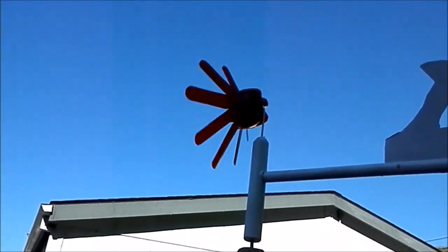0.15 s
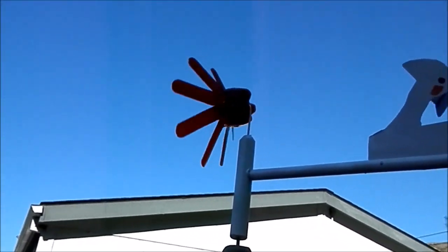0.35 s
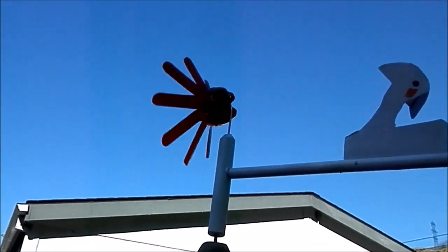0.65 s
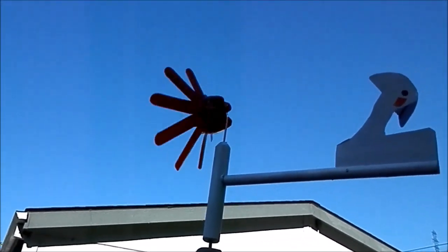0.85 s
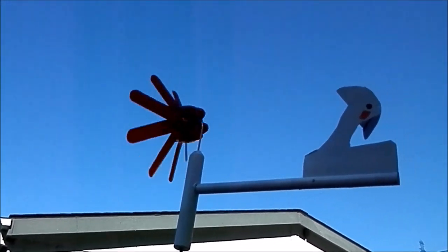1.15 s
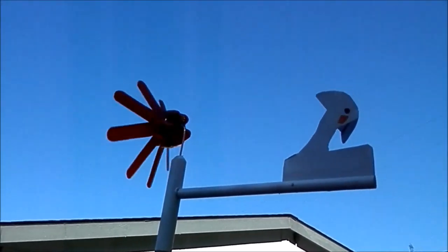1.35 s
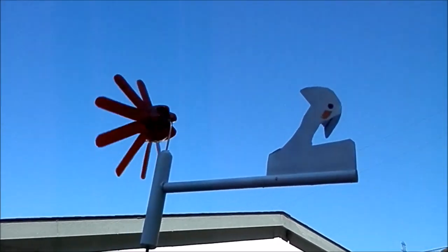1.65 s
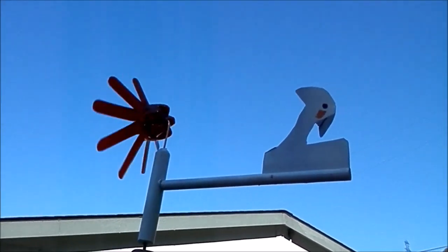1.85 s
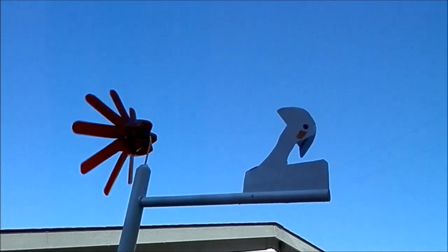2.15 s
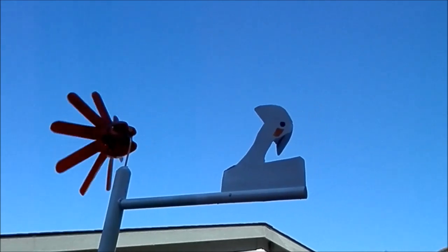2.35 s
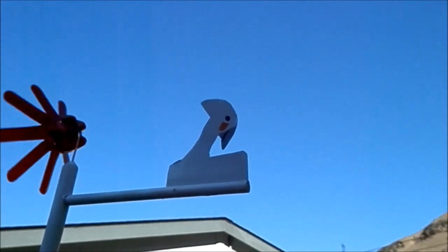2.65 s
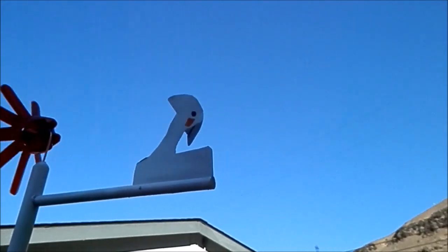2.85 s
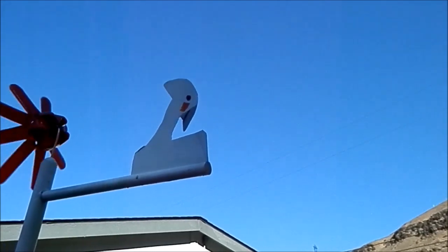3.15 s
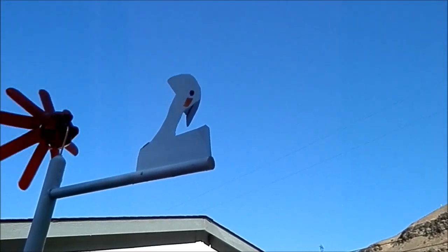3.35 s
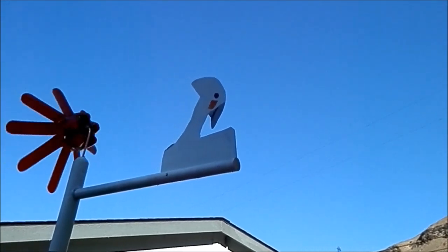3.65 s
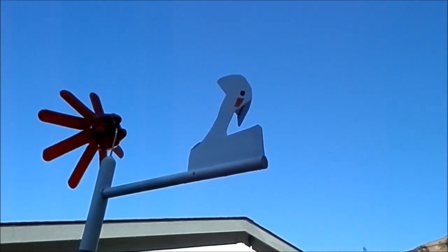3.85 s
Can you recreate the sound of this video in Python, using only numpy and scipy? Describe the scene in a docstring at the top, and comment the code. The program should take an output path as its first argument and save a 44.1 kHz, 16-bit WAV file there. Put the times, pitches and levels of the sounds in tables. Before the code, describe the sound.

A wind spinner chatters and clacks on its axle outdoors, with gusts rumbling later on.

```python
"""In a garden, a whirligig spins in the wind. Its loose hub chatters and scrapes on the axle,
in uneven surges, with sharper clacks. The dry axle sticks and slips, making brief squeaks,
while the shaken blades and arm give a hollow drone. From about halfway on, gusts buffet
the microphone, and the last one rustles through the blades. Open air rushes softly behind."""
import sys
import numpy as np
from scipy import signal
from scipy.fft import rfft, irfft, next_fast_len
from scipy.io import wavfile
from scipy.ndimage import uniform_filter1d, map_coordinates

SR = 44100
rng = np.random.default_rng(int(sys.argv[2]) if len(sys.argv) > 2 else 0)


def dump(signal):
    """Clip the signal to [-1, 1] and save it as 16-bit WAV at the path in sys.argv[1]."""
    limited = np.clip(np.atleast_2d(signal).T, -1, 1)
    pcm = np.round(limited * 32767).astype(np.int16)
    wavfile.write(sys.argv[1], SR, pcm)


N = 176400  # 4 seconds
TIME_S = np.arange(N) / SR
TOP_HZ = 15950  # the highest pitch in the scene

# Moments when the hub presses on the axle: time_s, half_length_s, rattle_db, hum_db
RUBS = [(.008, 0.0069, 13, -15), (0.198, 0.0092, 13.5, 1), (0.373, 0.013, 11, 13.5), (0.54, 0.035, 4.5, 7),
        (0.929, 0.018, 5, -12), (1.203, 0.036, 1.5, 6.5), (1.405, 0.03, 8, 12), (1.597, 0.015, 5.5, 15),
        (1.771, 0.015, 10, 2), (1.961, 0.035, 5.5, 12.5), (2.108, 0.009, 10.5, 16.5),
        (2.485, 0.012, 7.5, 15), (2.58, 0.019, 3.5, 17), (2.649, 0.018, 5, -4), (2.737, 0.033, 3, 10.5),
        (2.785, 0.0061, 15, 16), (2.975, 0.014, 5.5, -9), (3.513, 0.011, 7.5, 0), (3.709, 0.009, 9.5, 3),
        (3.897, 0.085, -13, 8)]
# How strongly the hub rattles between rubs: time_s, level_db
LOOSE_RATTLE = [(0, 2.5), (.3, 2), (.8, 2.5), (.86, -2), (1.02, 0), (1.45, 5), (1.54, -1.5), (1.7, 3),
                (1.87, -1), (2.15, 1.5), (2.45, 4), (2.53, -10), (2.62, -1), (2.87, -0.5), (3.08, 1),
                (3.2, -11), (3.31, -2.5), (3.42, -5), (3.75, -4), (4, 0)]
def whirligig():
    """The hub rubs on its axle, and that force shakes the whole toy."""
    loose_db = curve(LOOSE_RATTLE)
    _, _, rattle_db, hum_db = np.transpose(RUBS)
    force = rub_force(loose_db, rattle_db)
    follow = 0.68  # below 1, so the blades and arm swell less than the rattle
    hum_force = rub_force(follow * loose_db, hum_db)
    return hub(force, amp(loose_db)) + frame_drone(force ** follow) + arm_hum(hum_force)


def rub_force(between_db, peaks_db):
    """How hard the hub works against the axle: a base level plus a swell for each rub."""
    rubs = sum((amp(db) * swell(s, half)) ** 2 for (s, half, *_), db in zip(RUBS, peaks_db))
    return np.sqrt(amp(between_db) ** 2 + rubs)


# Tone of a hit, before and after the vane swings round: pitch_hz, before_db, after_db
HIT_TONE = [(258, -20, 3.5), (690, -3.5, 9.5), (1138, 0, 10), (1446, -8.5, -9), (2400, -4.5, 2),
            (3770, 0, 2), (4950, -13, -6.5), (6410, -4, -2), (9000, 0.5, 6.5), (11340, -12.5, -4.5),
            (14400, -9, -2.5)]
# Notes at which the hub and axle ring: pitch_hz, width_hz, boost_before_db, boost_after_db
HUB_NOTES = [(1428, 32, -8, 16.5), (1738, 68, 10.5, 16.5), (2824, 70, 6.5, 13), (3355, 78, 9.5, 13.5),
             (4790, 186, 7.5, 14.5), (6150, 690, 9.5, 7.5), (7890, 260, 13.5, -5), (8624, 150, 16, 8.5)]
def hub(force, loose):
    """Hits, scrapes and squeaks make the hub ring; its tone shifts as the vane swings round."""
    clumps = flicker(depth_db=4.5, per_s=32)  # the ticks come in bunches
    chatter = amp(-67.5) * loose * unit(clumps * ticks(per_s=150, spread_db=6))
    pressing = np.sqrt(np.abs(force ** 2 - loose ** 2))
    grind = amp(-67) * pressing * ticks(per_s=330, spread_db=4)  # pressing crowds the ticks together
    soften = signal.butter(2, 3700, fs=SR)  # turns down the treble above 3700 Hz
    scrape = amp(-72.5) * force * unit(signal.lfilter(*soften, grit(depth_db=8.5, per_s=270)))
    knocks = clacks()
    shaking = wander(chatter + grind + scrape) + knocks + squeaks() + chirps()
    tone, notes = np.array(HIT_TONE), np.array(HUB_NOTES)
    before = ring(shaking, tone[:, [0, 1]], notes[:, [0, 1, 2]])
    after = ring(shaking, tone[:, [0, 2]], notes[:, [0, 1, 3]])
    swing = curve([(0.77, 0), (2.13, 1)])  # the vane turns between these two times
    return (1 - swing) * before + swing * after


def wander(sound, depth_db=5):
    """The tone keeps changing as the touching point moves about."""
    spectrum = signal.stft(sound, nperseg=256)[2]
    drift = uniform_filter1d(rng.standard_normal(spectrum.shape), size=9, axis=0)  # smooth over pitch
    drift = uniform_filter1d(drift, size=6, axis=1)  # smooth over time
    return signal.istft(spectrum * amp(depth_db * np.tanh(unit(drift))), nperseg=256)[1][:N]


# Single hard knocks of the hub: start_s, relative_level_db
CLACKS = [(0.16, -47), (0.175, -39), (0.349, -38), (0.392, -37.5), (0.4858, -44), (0.5018, -39),
          (0.551, -39.5), (0.5966, -45.5), (0.7604, -39), (0.9034, -43.5), (1.5748, -44.5), (1.6684, -46),
          (1.736, -43.5), (2.0916, -45.5), (2.1429, -45), (2.2608, -48), (2.6272, -44), (2.6589, -38),
          (2.7033, -45), (2.82, -43.5), (3.5926, -40), (3.6938, -37.5), (3.8811, -37.5)]
def clacks():
    """The loose hub knocks sharply against the axle."""
    start_s, level_db = np.transpose(CLACKS)
    return hits(start_s, amp(level_db - 6), decay_s=0.002)


# Squeaks of the axle: middle_s, half_length_s, pitch_hz, level_db
SQUEAKS = [(0.222, 0.0051, 597, -55), (0.98, 0.0099, 975, -64), (1.322, 0.0054, 1240, -65),
           (2.564, 0.013, 691.5, -63), (2.747, 0.0094, 664.4, -60)]
def squeaks(waver=0.0096, uneven_db=3, dull_above_hz=5500):
    """The dry axle sticks and slips fast enough to sing a rough, wavering note."""
    out = np.zeros(N)
    wavering_time = np.cumsum(1 + waver * wobble(470)) / SR
    for middle_s, half_s, pitch_hz, level_db in SQUEAKS:
        level = swell(middle_s, half_s)
        on = level > .001
        overtones_hz = pitch_hz * np.arange(1, TOP_HZ // pitch_hz)[:, None]
        gains = amp(uneven_db * rng.standard_normal(overtones_hz.shape))
        gains /= 1 + (overtones_hz / dull_above_hz) ** 2
        cycles = overtones_hz * wavering_time[on] + rng.random(overtones_hz.shape)
        note = (gains * np.cos(2 * np.pi * cycles)).sum(0)
        out[on] += amp(level_db) * level[on] * unit(note)
    return out * flicker(depth_db=4, per_s=790)


# Single quick slips of the axle: middle_s, pitch_hz, level_db
CHIRPS = [(0.245, 4650, -64), (0.9715, 4000, -50), (1.344, 4470, -60)]
def chirps(half_s=0.0013, fall_octaves_per_s=110):
    """Each slip whistles downwards, with a weaker note an octave higher."""
    out = np.zeros(N)
    for middle_s, pitch_hz, level_db in CHIRPS:
        octaves = np.clip(fall_octaves_per_s * (middle_s - TIME_S), -.5, .5)
        phase = 2 * np.pi * np.cumsum(pitch_hz * 2 ** octaves) / SR
        out += amp(level_db) * swell(middle_s, half_s) * (np.sin(phase) + .5 * np.sin(2 * phase))
    return out


# Overall tone of the blades and arm: pitch_hz, level_db
FRAME_TONE = [(100, -25.5), (290, 4), (400, -2), (600, 0), (850, -4.5), (1200, -8), (1600, -23),
              (3000, -37)]
# Notes at which they ring: pitch_hz, width_hz, boost_db
FRAME_NOTES = [(488, 22.5, 15), (528.3, 12.4, 19), (626, 48, 8.5), (735, 17, 11), (944, 7, 9),
               (1107, 24.6, 15)]
def frame_drone(force):
    """The rattling hub makes the blades and arm ring with a hollow sound."""
    return amp(-62.5) * ring(force * grit(depth_db=4.5, per_s=90), FRAME_TONE, FRAME_NOTES)


def arm_hum(force, pitch_hz=494.8, waver_hz=23.77):
    """Rubbing keeps the arm's main note going, fluttering in pitch and loudness."""
    phase = 2 * np.pi * np.cumsum(pitch_hz + waver_hz * wobble(90)) / SR
    return amp(-66) * force * unit(np.sin(phase) * flicker(depth_db=4, per_s=65))


# Tone of air passing through the blades: pitch_hz, level_db
SWISH_TONE = [(600, 2), (1900, 15), (6300, 4), (12000, -26)]
def blade_swish(middle_s=3.92, half_s=.14, grains_per_s=290):
    """The last gust rustles through the blades as many tiny bursts of noise."""
    start_s = middle_s - 2 * half_s
    length_s = N / SR - start_s
    times = start_s + length_s * rng.random(int(length_s * grains_per_s))
    grains = unit(hits(times, np.ones(len(times)), decay_s=0.0028))
    grains *= np.sqrt(length_s * SR / N)  # strength 1 over just the part that sounds
    return amp(-64) * swell(middle_s, half_s) * ring(grains, SWISH_TONE)


# Strength of the wind on the microphone: time_s, level_db
GUSTS = [(0, -72), (1.42, -78), (1.5, -46), (1.68, -63.5), (1.93, -59), (2.04, -41.5), (2.27, -45.5),
         (2.39, -49), (2.54, -40), (2.82, -40.5), (2.89, -54), (2.99, -34), (3.08, -48), (3.28, -49.5),
         (3.45, -39), (3.85, -38.5), (3.94, -64.5)]
# Single swirls of air hitting the microphone: middle_s, peak_db, half_length_s
THUMPS = [(1.5, -37.5, 0.0059), (2.102, -29, 0.0026), (2.301, -28.5, 0.003), (2.533, -26.5, 0.0025),
          (2.701, -27.5, 0.0021), (2.729, -26.5, .0025), (2.8008, -20.5, 0.00168), (2.821, -27, 0.0025),
          (2.985, -29, 0.0051), (2.994, -22.5, 0.0014), (3.344, -30, 0.0036), (3.467, -26.5, 0.0019),
          (3.638, -27, 0.0016)]
# Tone of the deep rumble: pitch_hz, level_db
RUMBLE_TONE = [(15, -2.5), (30, 1), (85, 0.5), (150, -8), (230, -16), (450, -36), (4000, -82)]
# Tone of the small, fluttering swirls: pitch_hz, level_db
FLUTTER_TONE = [(60, -13.5), (170, 0), (330, -10), (800, -30.5), (3000, -59.5)]
def wind():
    """Gusts rumble and thump on the microphone; small swirls make the strong ones brighter."""
    gust = amp(curve(GUSTS))
    rumble = gust * ring(grit(depth_db=4.5, per_s=30), RUMBLE_TONE)
    wakes = amp(-20.5) * sum(amp(db) * swell(s, half_s=0.015) for s, db, _ in THUMPS)  # stirred-up air
    swirls = amp(-12) * gust.max() * (gust / gust.max()) ** 2.5
    flutter = np.hypot(swirls, wakes) * ring(grit(depth_db=7.5, per_s=120), FLUTTER_TONE)
    thumps = np.zeros(N)
    for middle_s, peak_db, half_s in THUMPS:
        offset = (TIME_S - middle_s) / half_s
        thumps += amp(peak_db) * (1 - offset ** 2) / (1 + offset ** 2) ** 2  # a push between two dips
    return rumble + flutter + thumps


# Tone of the background air: pitch_hz, level_db
AIR_TONE = [(20, 11), (250, 8), (1000, -11.5), (2500, -21.5), (8000, -61), (16000, -47)]
def open_air():
    """The air outdoors makes a soft, low, steady rush."""
    return amp(-63) * ring(rng.standard_normal(N), AIR_TONE)


def ticks(per_s, spread_db, jitter=.6):
    """A run of small hits, uneven in timing and loudness."""
    early_late, soft_loud = rng.standard_normal((N // 100, 2)).T
    times = (np.arange(len(early_late)) + jitter * early_late) / per_s
    return unit(hits(times, amp(spread_db * np.tanh(soft_loud)), decay_s=0.00095))


def hits(times, gains, decay_s, buzz_s=.004, buzz_db=-10):
    """Each hit is a sharp crack followed by a short, weaker buzz."""
    starts = np.clip(times * SR, 0, N).astype(int)
    power = np.bincount(starts, gains ** 2, N + 1)[:N]
    crack, buzz = (signal.lfilter([1], [1, -np.exp(-2 / (s * SR))], power) for s in (decay_s, buzz_s))
    return np.sqrt(crack + amp(buzz_db) ** 2 * buzz) * rng.standard_normal(N)


def ring(sound, tone, notes=()):
    """Give a sound an overall tone and, if wanted, notes that ring on."""
    size = 2 ** 14
    hz = np.fft.rfftfreq(size, 1 / SR)
    tone_hz, tone_db = np.transpose(tone)
    gain = amp(np.interp(np.log(hz + 1), np.log(tone_hz + 1), tone_db))
    boost = 1 + sum(amp(db) ** 2 / (1 + (2 * (hz - pitch) / width) ** 2) for pitch, width, db in notes)
    # Fold the filter in time so that ringing comes after a hit, never before it.
    folded = irfft(np.log(gain * np.sqrt(boost)))
    folded[1:size // 2] *= 2
    folded[size // 2 + 1:] = 0
    ringing = irfft(np.exp(rfft(folded)))
    return signal.fftconvolve(sound, ringing / np.linalg.norm(ringing))[:N]


def grit(depth_db, per_s):
    """Rough noise whose loudness flickers."""
    return unit(rng.standard_normal(N) * flicker(depth_db, per_s))


def flicker(depth_db, per_s):
    """A volume that moves at random, up or down by at most depth_db."""
    return amp(depth_db * np.tanh(wobble(per_s)))


def wobble(per_s):
    """A smooth curve through per_s random values each second."""
    return map_coordinates(rng.standard_normal(N // 8), [TIME_S * per_s], mode="wrap")


def swell(middle_s, half_s):
    """A bell-shaped rise and fall around a moment."""
    return np.exp(-.5 * ((TIME_S - middle_s) / half_s) ** 2)


def curve(points):
    """Join (time_s, value) points with straight lines."""
    return np.interp(TIME_S, *np.transpose(points))


def unit(sound):
    """Scale to an average strength (rms) of 1."""
    return sound / np.sqrt(np.mean(sound ** 2) + 1e-20)


def amp(db):
    """Turn decibels into a number to multiply by."""
    return 10 ** (np.asarray(db) / 20)


def scene():
    """Mix the whirligig, the wind and the open air into one channel."""
    return (whirligig() + blade_swish() + wind() + open_air())[None]


def record(dry):
    """Cut away the treble above TOP_HZ."""
    size = next_fast_len(N + SR // 2)
    kept = np.fft.rfftfreq(size, 1 / SR) < TOP_HZ
    return irfft(rfft(dry, size) * kept, size)[..., :N]


dry = scene()
out = record(dry)
dump(out)
```